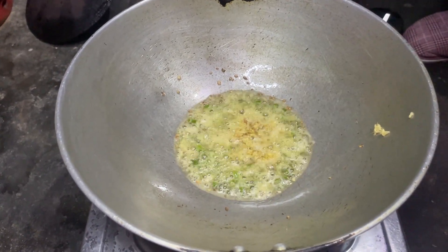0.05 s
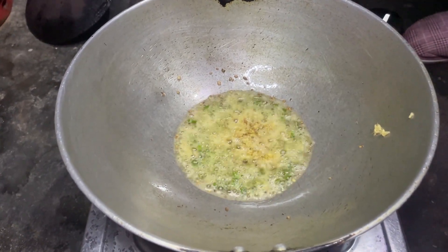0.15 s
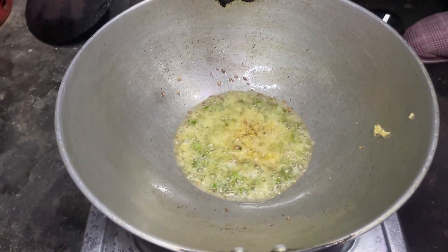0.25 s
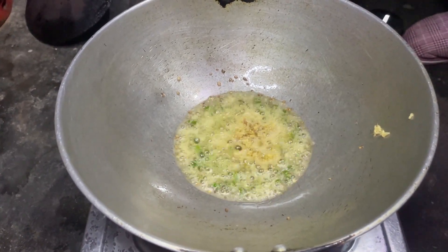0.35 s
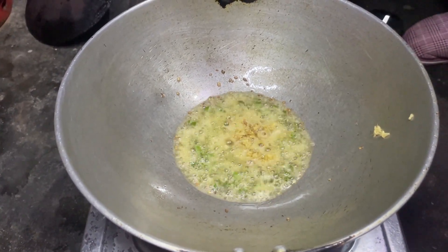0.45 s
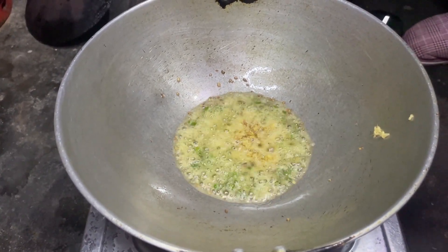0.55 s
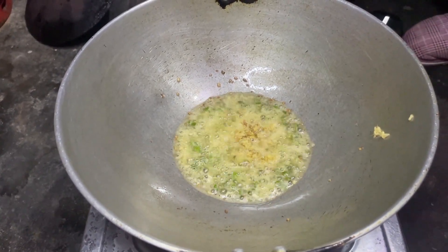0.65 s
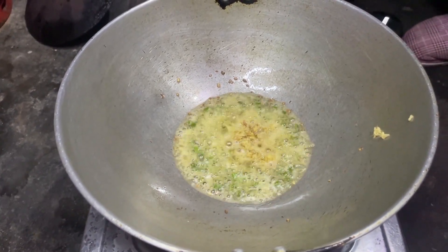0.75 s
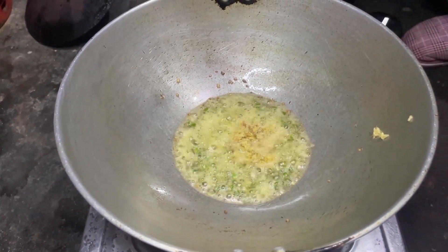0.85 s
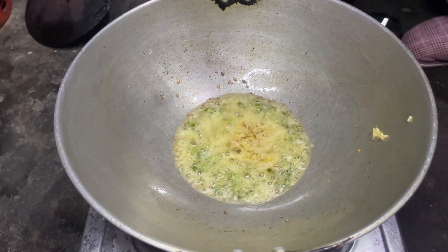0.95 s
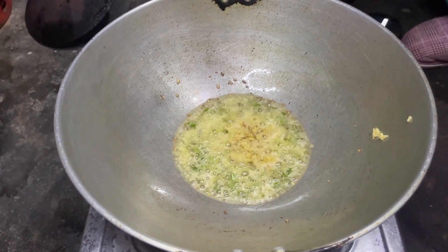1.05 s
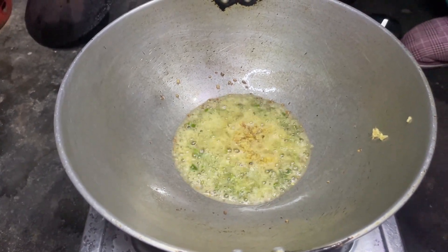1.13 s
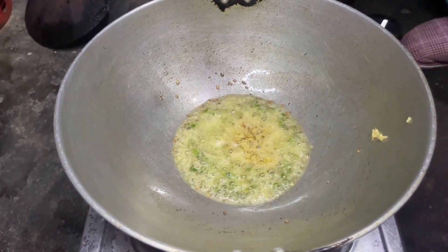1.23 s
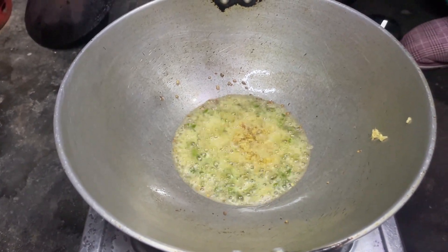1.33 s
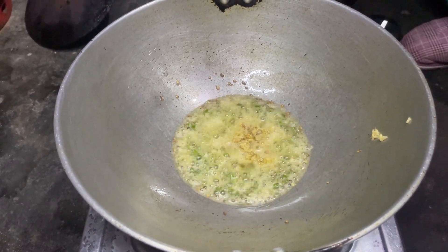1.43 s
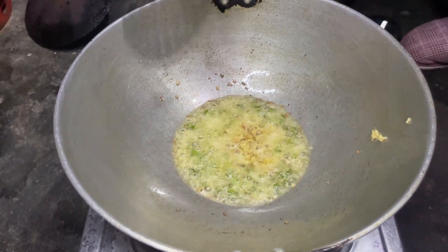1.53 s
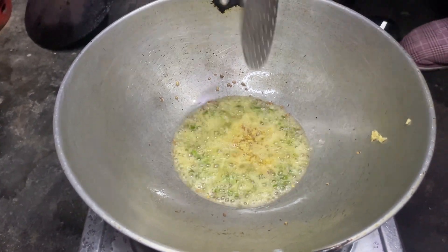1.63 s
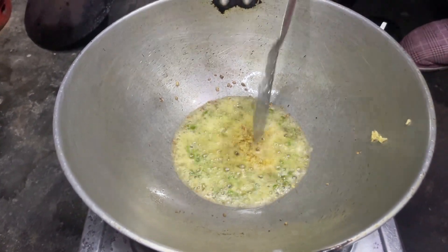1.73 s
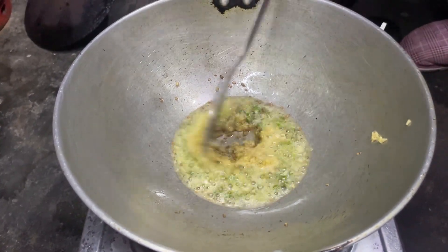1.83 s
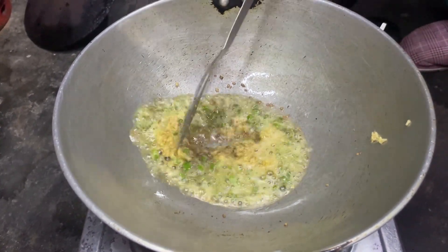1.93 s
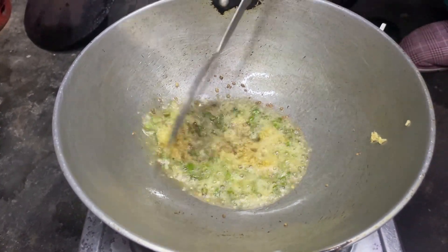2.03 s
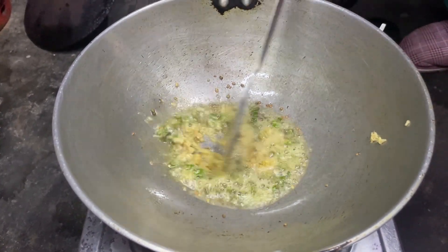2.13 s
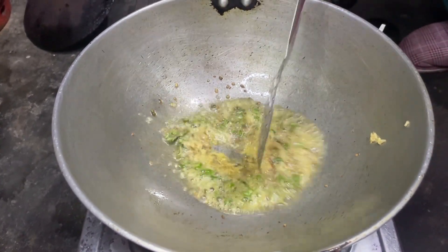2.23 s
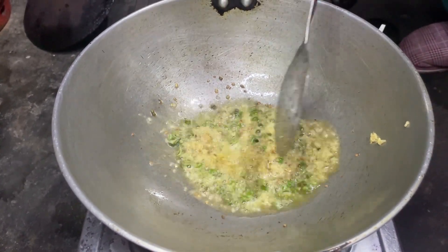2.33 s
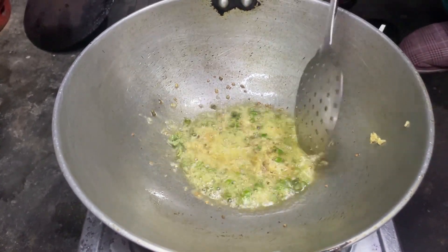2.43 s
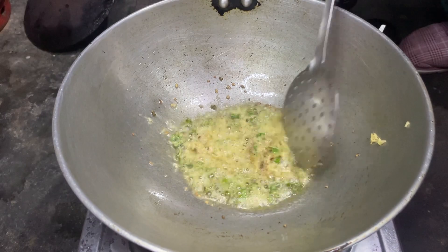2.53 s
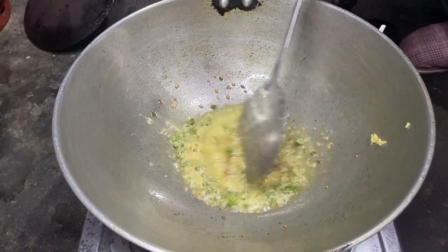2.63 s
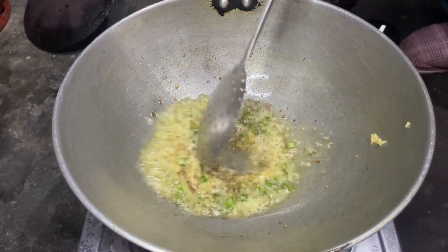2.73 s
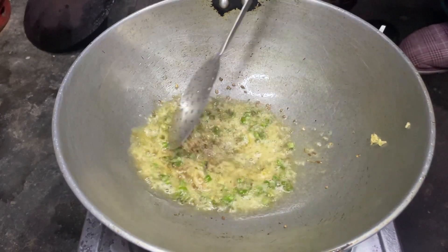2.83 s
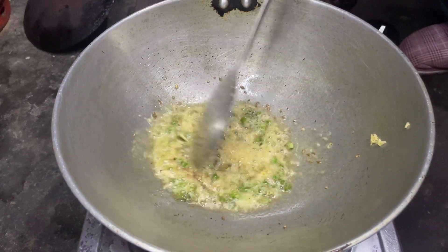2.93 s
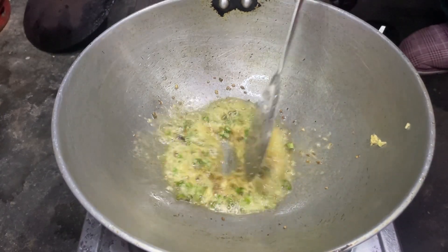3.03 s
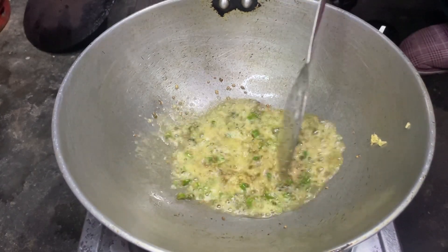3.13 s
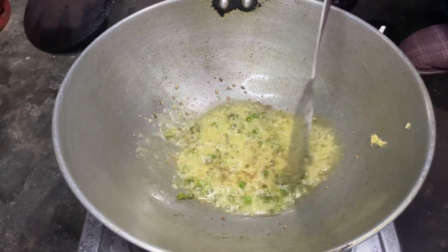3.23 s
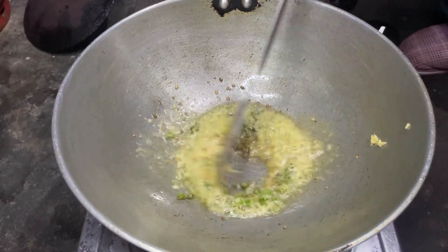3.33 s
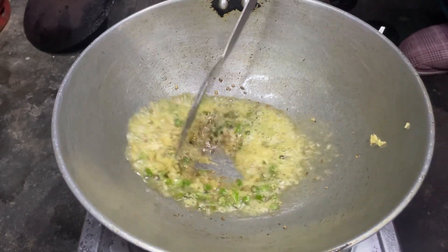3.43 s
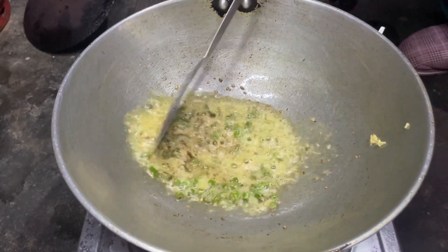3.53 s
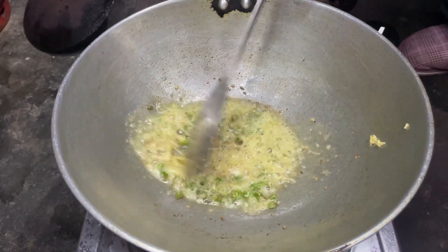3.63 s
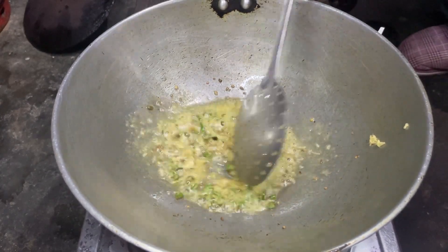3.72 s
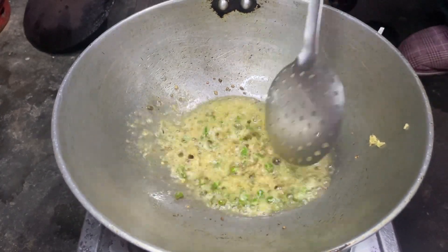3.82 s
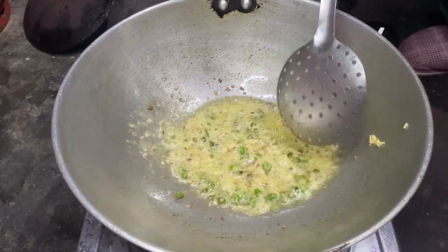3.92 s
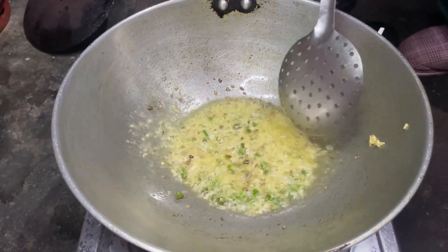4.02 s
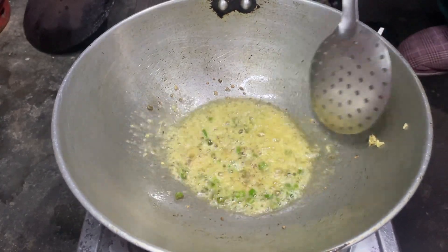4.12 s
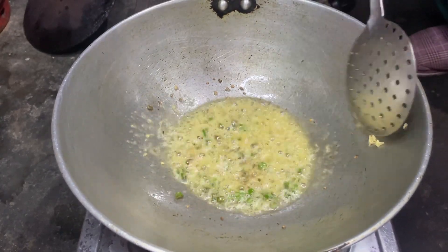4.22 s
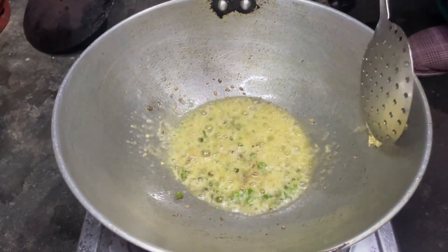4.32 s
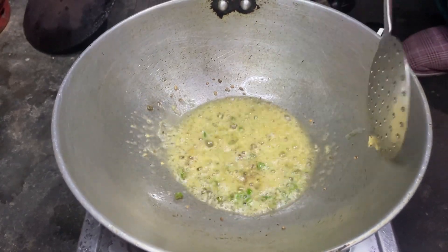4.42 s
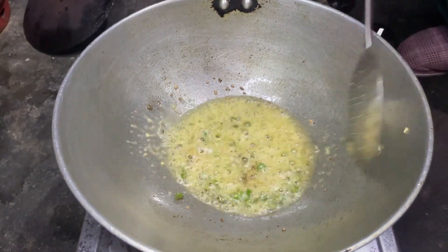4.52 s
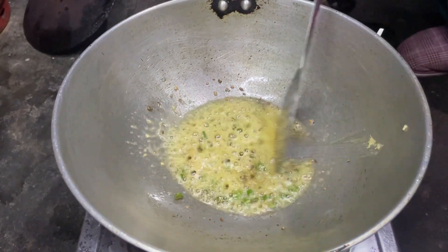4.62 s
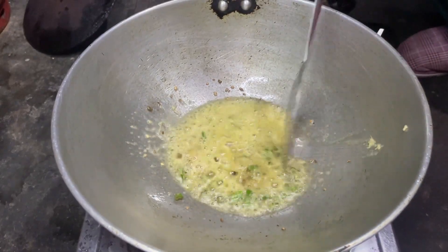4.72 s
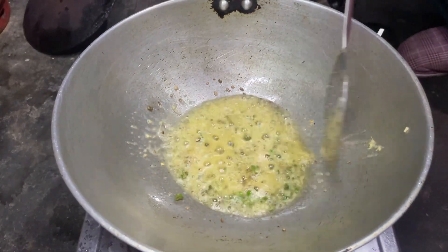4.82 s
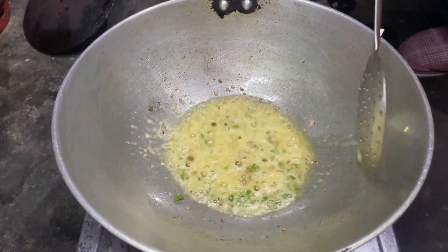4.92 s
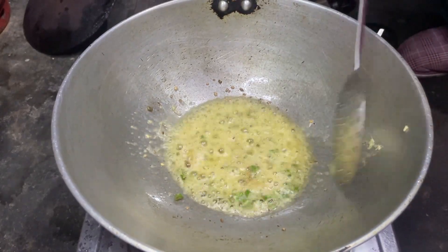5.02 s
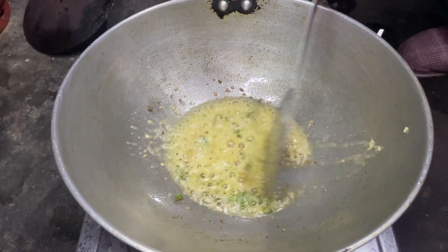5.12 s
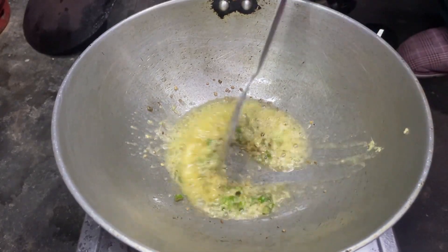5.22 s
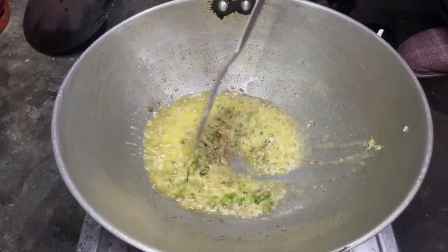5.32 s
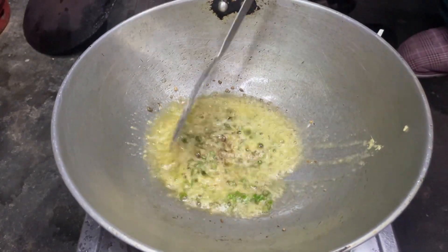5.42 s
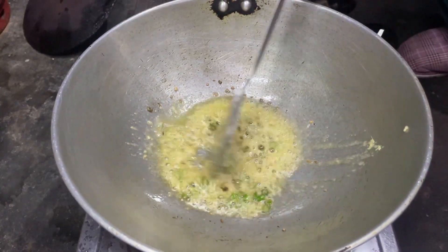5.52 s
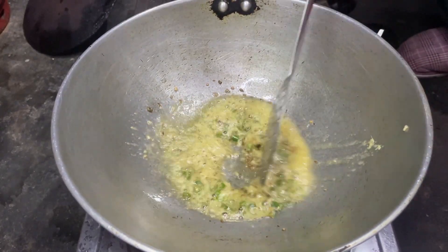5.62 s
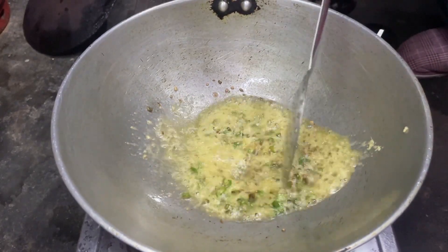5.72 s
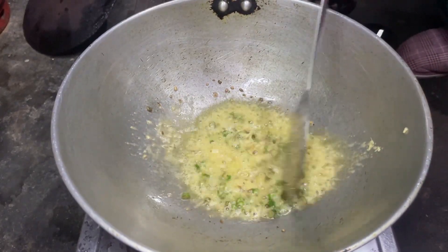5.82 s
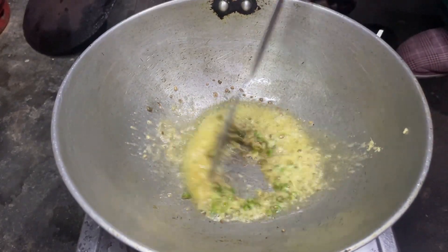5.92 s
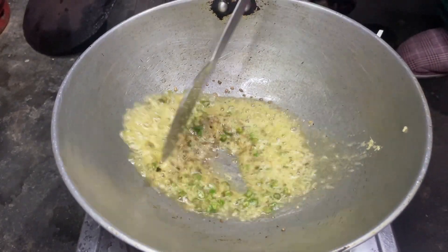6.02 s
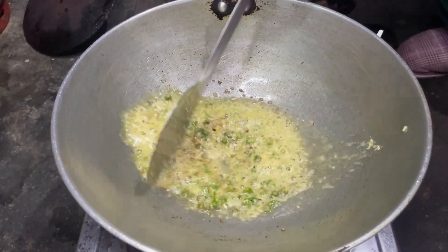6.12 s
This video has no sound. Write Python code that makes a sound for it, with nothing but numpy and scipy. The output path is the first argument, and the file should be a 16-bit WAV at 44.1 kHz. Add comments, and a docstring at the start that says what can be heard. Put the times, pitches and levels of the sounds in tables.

```python
"""A clink of steel dies away over the steady sizzle of garlic, chilli and spices in hot oil in a metal wok.
Oil spits throughout; a slotted metal spoon then stirs, lifting the sizzle, and knocks and scrapes on the wok.
The sizzle is spiky noise plus bursting-bubble grains, the spits are snaps with spray, the clink and
knocks are ringing modes, and the scrapes are jerky noise with a squeal. A gas flame's rumble and a hum
lie under it all; a close pair of microphones hears it in a small kitchen."""
import sys
import numpy as np
from scipy import signal
from scipy.fft import rfft, irfft, next_fast_len
from scipy.io import wavfile
from scipy.ndimage import map_coordinates

SR = 44100
rng = np.random.default_rng(int(sys.argv[2]) if len(sys.argv) > 2 else 0)


def generate_wav(sig):
    """Save sig (samples, or channels by samples) to the path in sys.argv[1] as 16-bit PCM at SR."""
    pcm = np.round(np.clip(np.atleast_2d(sig).T, -1, 1) * 32767).astype(np.int16)
    wavfile.write(sys.argv[1], SR, pcm)


N = 271656
TIME = np.arange(N) / SR
TOP_HZ = 15850  # band limit of the whole mix


def amp(db):
    """Decibels to a linear factor."""
    return 10 ** (np.asarray(db) / 20)


def unit(x):
    """x scaled to an RMS of one."""
    return x / np.sqrt(np.mean(x ** 2) + 1e-20)


def along(points, hz):
    """A curve of (frequency, value) points read on a log frequency axis."""
    f, v = np.transpose(points)
    return np.interp(np.log(hz + 1), np.log(f), v)


def wobble(rate):
    """A smooth random curve with rate knots a second."""
    knots = rng.standard_normal(int(N * rate / SR) + 4)
    return map_coordinates(knots, [TIME * rate])


def filtered(x, response):
    """x times a complex response of frequency."""
    m = next_fast_len(N + SR // 2)
    return irfft(rfft(x, m) * response(np.fft.rfftfreq(m, 1 / SR)), m)[..., :N]


def coloured(x, points, size=4096):
    """x through a causal, minimum-phase filter of unit energy with the given spectrum."""
    cepstrum = irfft(np.log(amp(along(points, np.fft.rfftfreq(size, 1 / SR)))))
    cepstrum[1:size // 2] *= 2
    cepstrum[size // 2 + 1:] = 0
    kernel = irfft(np.exp(rfft(cepstrum)))
    return signal.fftconvolve(x, kernel / np.linalg.norm(kernel))[:len(x)]


def lowpass(x, order, hz):
    """x with the treble above hz rolled off."""
    return signal.lfilter(*signal.butter(order, hz, fs=SR), x)


def resonate(x, peaks):
    """x through a bank of resonances in parallel."""
    return sum(amp(db) * signal.lfilter(*signal.iirpeak(hz, hz / width, fs=SR), x) for hz, width, db in peaks)


def add(track, s, sound):
    """Mix a sound into the track at time s."""
    start = max(round(s * SR), 0)
    track[start:start + len(sound)] += sound[:N - start]


def ring(modes):
    """Decaying modes of struck metal, each starting at a chance point of its swing."""
    t = TIME[:SR // 2]
    out = np.zeros(len(t))
    for hz, db, t60 in modes:
        out += amp(db - 60 * t / t60) * np.sin(2 * np.pi * (hz * t + rng.random()))
    return out


# a steel utensil ringing out: (pitch [Hz], level [dB], t60 [s])
UTENSIL_MODES = [(736, -25.5, 0.2), (1100, -33.5, 0.26), (1850, -35, 0.09), (2050, -23, 0.089),
                 (2457, -25.5, 0.27), (3165, -40, 0.6)]


def utensil():
    """Steel modes already ringing as the sound begins, faded in over 1.9 ms so the opening does not click."""
    out = np.zeros(N)
    add(out, 0, ring(UTENSIL_MODES))
    rise_s = 0.0019
    return out * (1 - np.exp(-TIME / rise_s))


# sweeps of the spoon through the food: (time at the height [s], extra sizzle [dB])
SWEEPS = [(2.23, 0.4), (3.1, 1), (3.52, 2.5), (3.78, 2), (5.92, 1.5)]
SWEEP_RISE_S, SWEEP_FALL_S = 0.14, 0.22


def flare_db():
    """Every sweep swells the sizzle and lets it sink back."""
    total = np.zeros(N)
    for s, db in SWEEPS:
        width = np.where(TIME < s, SWEEP_RISE_S, SWEEP_FALL_S)
        total += db * np.exp(-((TIME - s) / width) ** 2)
    return total


# the undisturbed oil, and what stirring adds by pushing wet pieces onto hot metal
CALM_SIZZLE_DB, CALM_BURBLE_DB = -39, -48
STIR_START_S, STIR_RISE_S, STIR_SIZZLE_DB, STIR_BURBLE_DB = 1.72, 0.37, 4.5, 3


def frying():
    """How far the food is stirred up (0-1), and the sizzle and burble levels [dB] that follow from it."""
    stirred = np.clip((TIME - STIR_START_S) / STIR_RISE_S, 0, 1)
    sizzle_db = CALM_SIZZLE_DB + STIR_SIZZLE_DB * stirred + flare_db()
    return stirred, sizzle_db, CALM_BURBLE_DB + STIR_BURBLE_DB * stirred


def bubbles(rate, pitch_hz, spread, cycles, size_db, size=64):
    """Bursting bubbles, each a damped cosine of a few cycles; rate is per second, for every sample."""
    count = 60000  # candidates, thinned out to the wanted rate
    when, chance = rng.random(count), rng.random(count)
    detune, bulk = rng.standard_normal(count), rng.exponential(size=count)
    start = (when * N).astype(int)
    keep = chance < rate[start] * N / SR / count
    hz = np.minimum(pitch_hz * np.exp(spread * detune[keep]), SR / 3)
    turns = hz[:, None] * TIME[:size]
    loudness = amp(size_db * np.minimum(bulk[keep], 4))[:, None]
    grains = loudness * np.exp(-turns / cycles) * np.cos(2 * np.pi * turns)
    places = start[keep, None] + np.arange(size)
    return np.bincount(places.ravel(), grains.ravel(), N + size)[:N]


# colour of the bursting steam bubbles: (frequency [Hz], relative level [dB])
STEAM_COLOUR = [(200, -21.5), (600, -14), (1100, -1.5), (1450, -4.5), (1900, -1.5), (3300, -3.5),
                (5400, -2.5), (7500, 0.5), (9000, -1), (13000, -3.5), (15500, -2)]


def fizz(stirred):
    """The finest bubbles blur into spiky noise, brighter when stirred and never quite steady."""
    spikes = rng.standard_normal(N) * amp(7.6 * rng.standard_normal(N))
    bright = unit(coloured(spikes, STEAM_COLOUR))
    dull = filtered(bright, lambda hz: 1 / np.sqrt(1 + (hz / 6500) ** 2))
    return (stirred * bright + (1 - stirred) * dull) * amp(1.58 + 1.5 * wobble(25.08))


def crackle(stirred):
    """Separate steam bubbles burst at an uneven rate, more densely once stirred."""
    rate = (800 + 1700 * stirred) * amp(2.3 * wobble(30))
    bursts = bubbles(rate, pitch_hz=6760, spread=0.48, cycles=0.42, size_db=4.0)
    evened = bursts / np.sqrt(1 + 1.24 * stirred)  # offsets the loudness of the denser bursts
    return unit(coloured(evened, STEAM_COLOUR)) * amp(0.5)


# the foam wells up or sloshes round the spoon: (time at the height [s], half length [s], level [dB])
SURGES = [(1.25, 0.46, -51), (2.646, 0.06, -45.5), (5.122, 0.046, -46)]
# the hollow note of the bowl in a surge: (pitch [Hz], width [Hz], relative level [dB])
HOLLOW = [(403, 128, 2)]


def surges(foam):
    """The foam swells through the bowl's hollow resonance, applied twice for a sharper note."""
    hollow = unit(resonate(resonate(foam, HOLLOW), HOLLOW))
    swell = sum(amp(db) * np.exp(-((TIME - s) / half) ** 2) for s, half, db in SURGES)
    return swell * hollow


# colour of the foaming oil: (frequency [Hz], relative level [dB])
FOAM_COLOUR = [(80, -17.5), (170, -12), (225, 4), (270, -13), (330, 2), (410, -3), (600, 1), (1100, 0.5),
               (2500, -11.5), (6000, -71)]


def sizzle():
    """Water leaves the food as steam: a fine fizz, separate crackles and the burble of the foam."""
    stirred, sizzle_db, burble_db = frying()
    steam = amp(sizzle_db) * (fizz(stirred) + crackle(stirred))
    foam = bubbles(np.full(N, 1200), pitch_hz=630, spread=0.55, cycles=1.0, size_db=1.5, size=600)
    burble = amp(burble_db) * unit(coloured(foam, FOAM_COLOUR))
    return steam + burble + surges(foam)


# burner rumble: (frequency [Hz], relative level [dB])
RUMBLE_COLOUR = [(15, -7), (36, -6), (48, 9), (75, -1.5), (120, -5), (150, -2.5), (200, -4.5), (400, -16.5),
                 (1500, -32)]
# kitchen hum: (pitch [Hz], relative level [dB], unsteadiness [share])
HUM = [(58.9, -47.5, 0.54), (101.5, -53.5, 0.79)]


def stove():
    """The flame rumbles, partly alike on both sides, under a hum wavering in level and phase."""
    shared, left, right = [unit(coloured(rng.standard_normal(N), RUMBLE_COLOUR)) for _ in range(3)]
    rumble = amp(-49) * (shared + 0.71 * np.array([left, right]))
    hum = np.zeros(N)
    for hz, db, unsteady in HUM:
        waver = 1 + unsteady * (wobble(13) + 1j * wobble(24))
        hum += amp(db - 1.0) * np.real(waver * np.exp(2j * np.pi * hz * TIME))
    return (rumble + hum) * amp([[.7], [-.7]])  # a little louder on the left


def snap(hz):
    """A pressure flick that swells and dies within a cycle or two."""
    cycles = hz * TIME[:300]
    age = cycles / 0.35  # the envelope peaks after 0.35 cycles
    return np.sin(2 * np.pi * cycles) * age * np.exp(1 - age)


# the loudest spits of oil: (time [s], level of the snap's envelope peak [dB], pitch [Hz])
SPITS = [(0.181, -16, 5430), (0.29, -19, 3400), (0.3999, -11, 4600), (0.4196, -15, 4300),
         (0.4686, -13.5, 5700), (0.533, -20, 2180), (0.6219, -16, 7500), (0.7305, -14.5, 6500),
         (0.7932, -18, 5940), (0.8501, -16, 4830), (0.9583, -18.5, 2970), (0.9944, -25, 5800),
         (1.0473, -10, 5540), (1.056, -15, 4030), (1.0968, -17, 4400), (1.179, -14, 5800),
         (1.2028, -10, 9900), (1.2959, -16, 5000), (1.462, -17, 3200), (1.501, -17, 2430),
         (1.5605, -14, 3940), (1.6382, -14, 10000), (1.7294, -25, 4340), (1.8054, -9, 9000),
         (1.9217, -13, 5600), (1.94, -14, 4300), (2.0702, -17, 11000), (2.205, -8, 10500),
         (2.715, -9.5, 4500), (2.825, -16.5, 4900), (3.1017, -17, 4100), (3.26, -7, 6300),
         (3.39, -17, 5950), (3.8764, -9, 6500), (3.9006, -4, 4540), (4.292, -5, 11500), (4.3294, -10, 6600),
         (4.478, -8.5, 6600), (4.5065, -13, 4220), (4.8103, -10.5, 3400), (4.9877, -7, 5900),
         (4.9887, -16.5, 3950), (5.1657, -20, 3800), (5.3948, -20, 2370), (5.784, -13.5, 3020),
         (5.8773, -16, 5500), (5.9118, -14.5, 2540), (6.0667, -11.5, 6350)]
SPRAY_DB, SPRAY_S = -9.5, 0.00055  # against the snap; decay time
POP_HZ, POP_DB = 1300, -17.5  # soft pop of the collapsing bubble, against the snap


def spits():
    """Big bubbles snap, pop and throw a fine spray, all within a few milliseconds."""
    out, t = np.zeros(N), TIME[:300]
    for s, db, hz in SPITS:
        spray = amp(SPRAY_DB) * rng.standard_normal(len(t)) * np.exp(-t / SPRAY_S)
        pop = amp(POP_DB) * snap(POP_HZ)
        add(out, s, amp(db) * (snap(hz) + pop + spray))
    return out


# the dense, quickly damped rattle of spoon on wok: (frequency [Hz], relative level [dB])
CLANK_COLOUR = [(90, -40), (180, 0), (500, 1), (800, 2.5), (1200, 0), (1800, 9.5), (2700, -4), (3500, 3),
                (5700, 9.5), (7000, 1), (8000, 5), (15000, -2.5)]


def clatter(t60):
    """Clank-coloured noise dying away, for modes too dense to hear singly."""
    t = TIME[:SR // 2]
    return coloured(rng.standard_normal(len(t)) * amp(-60 * t / t60), CLANK_COLOUR)


# spoon blows, thin high on the wall, dull where food cushions them:
# (time [s], strength [dB], freedom to ring [0-1], lowest frequency [Hz], highest frequency [Hz])
KNOCKS = [(1.7736, 1.5, 0.34, 110, 420), (1.789, -2, 0.3, 120, 280), (2.215, 6.5, 0.22, 2200, 2750),
          (2.5205, 7.5, 0.45, 230, 14000), (2.5305, -3, 0.5, 700, 6000), (2.611, -9.5, 0.5, 500, 7000),
          (3.9, 0.5, 0.3, 453, 2280), (4.4, -8, 0, 1000, 15000), (4.52, 0, 0.66, 150, 300),
          (5.4685, 8.5, 0.54, 170, 724)]
# the flexing bowl's thump: (frequency [Hz], relative level [dB])
THUMP_COLOUR = [(80, -17), (180, -0.5), (500, 2.5), (900, -1), (1400, -8), (3000, -8), (9000, -46)]
# the wok with the spoon on it: (pitch [Hz], relative level [dB], t60 [s])
WOK_MODES = [(236, 1, 0.31), (321.5, 0.5, 0.44), (402, -3, 0.45), (500, 1.5, 0.41), (696, 2, 0.32),
             (760, 2.5, 0.29), (1107, -3, 0.22), (1830, 10.5, 0.12), (1980, 7, 0.16), (2222, 9.5, 0.31),
             (3260, 10, 0.1), (3430, 10, 0.15), (4750, 7.5, 0.2), (4960, 8, 0.12), (5290, 1, 0.2),
             (5900, 14, 0.13), (6270, 6, 0.1), (6870, 19, 0.086), (7100, 10, 0.11)]
# levels against the blow's strength, and decays when wholly free to ring
THUMP_DB, RATTLE_DB, SHIMMER_DB, RING_DB = -3, -18.5, -26.5, -39
RATTLE_T60_S, SHIMMER_T60_S, SHIMMER_HZ = 0.093, 0.22, 5500


def knocks():
    """Spoon hits wok: a thump, a rattle, a duller, longer shimmer and modes, damped by a pressed spoon."""
    out = np.zeros(N)
    count = SR // 2
    hz = np.fft.rfftfreq(count, 1 / SR)
    flex = irfft(np.exp(-2j * np.pi * 0.1435 * np.sqrt(hz)), count)  # bending waves: treble arrives first
    thump = coloured(flex, THUMP_COLOUR)
    for s, db, free, low_hz, high_hz in KNOCKS:
        free = np.clip(free, .05, 1)
        blow = amp(THUMP_DB) * thump
        blow += amp(RATTLE_DB) * clatter(free * RATTLE_T60_S)
        blow += amp(SHIMMER_DB) * lowpass(clatter(free * SHIMMER_T60_S), 1, SHIMMER_HZ)
        blow += free * amp(RING_DB) * ring(WOK_MODES)
        blow = signal.lfilter(*signal.butter(2, low_hz, "high", fs=SR), amp(db) * blow)
        add(out, s, lowpass(blow, 3, min(high_hz, TOP_HZ)))  # a soft contact dulls the blow
    return out


# the spoon's edge dragging on the wok: (time [s], length [s], share of it spent rising [0-1], level [dB],
# ringing against the rasp [dB], squeal pitch [Hz], squeal level [dB], highest rasp and ringing [Hz])
SCRAPES = [(2.532, 0.13, 0.26, -36.5, -9, 2220, -36.5, 6000),
           (4.398, 0.043, 0.09, -24.5, -5, 6440, -30, 15000), (5.022, 0.069, 0.52, -31, 2, 5410, -31, 9000)]
# the dry rasp of its edge: (frequency [Hz], relative level [dB])
RASP_COLOUR = [(100, -18), (250, 0), (600, -8), (1080, 4), (1500, -11), (2200, -6), (3000, -4),
               (4500, -2.5), (6500, 1), (8000, 7), (15000, -6.5)]
# the spoon's resonances when it is rubbed: (pitch [Hz], width [Hz], relative level [dB])
SPOON_MODES = [(1110, 110, -5), (2160, 60, -6.5), (4120, 30, -10), (4746, 42, 0.5), (5850, 40, -3),
               (6200, 35, -2), (6370, 35, 7), (7320, 30, 4), (7350, 60, 0)]
SQUEAL_WANDER = 0.0015  # share of its pitch


def scrapes():
    """The edge slips in tiny jerks that rasp and drive its resonances; a squeal follows the pressure."""
    out, t = np.zeros(N), TIME[:SR // 2]
    for s, length, rising, db, ring_db, squeal_hz, squeal_db, high_hz in SCRAPES:
        pressure = np.interp(t, [0, length * np.clip(rising, .02, .9), length], [0, 1, 0])
        jerks = rng.standard_normal(len(t)) * amp(2.0 * rng.standard_normal(len(t)))
        slips = jerks * pressure ** 0.98
        ringing = amp(ring_db) * unit(resonate(slips, SPOON_MODES))
        rub = lowpass(unit(coloured(slips, RASP_COLOUR)) + ringing, 2, min(high_hz, TOP_HZ))
        rub = rub / np.std(rub[:int(length * SR)])
        turns = np.cumsum(squeal_hz * (1 + SQUEAL_WANDER * wobble(60)[:len(t)])) / SR
        squeal = amp(squeal_db) * np.sqrt(pressure) * np.sin(2 * np.pi * turns)
        add(out, s, amp(db) * rub + squeal)
    return out


# colour of the diffuse echo, much weaker above 7 kHz: (frequency [Hz], level [dB])
ECHO_COLOUR = [(100, -13.5), (500, -3.5), (1500, -2), (3000, -1.5), (6500, -5), (8000, -19), (15000, -17.5)]


def diffuse_echo(x, bowl_t60, room_t60, room_db, size=2048, count=12288):
    """Quick reflections in the bowl, then the walls: noise tails redrawn per side every 2048 samples."""
    t = TIME[:count]
    envelope = amp(-60 * t / bowl_t60) + amp(room_db - 60 * t / room_t60)
    envelope = envelope * (t > .0006)  # the first echo comes after 0.6 ms
    pieces = np.pad(x, (0, -N % size)).reshape(-1, size)
    wet = np.zeros((2, N))
    for side in wet:
        tails = rng.standard_normal((len(pieces), count)) * envelope / np.linalg.norm(envelope)
        for k, echo in enumerate(signal.fftconvolve(pieces, tails, axes=1)):
            add(side, k * size / SR, echo)
    return filtered(wet, lambda hz: amp(along(ECHO_COLOUR, hz)))


# phase between the microphones: (frequency [Hz], lead of the right [rad])
RIGHT_LEAD = [(100, 0.08), (800, -0.51), (1700, 0.09), (2800, -1.91), (3600, -0.17), (4200, -0.07),
              (5000, -1.14), (5800, 0.37), (6800, 1.31), (7800, 3.09), (8800, 3.26), (10500, 5.77),
              (12200, 6.35), (14500, 9.36)]
# level between the microphones: (frequency [Hz], left over right [dB])
LEFT_TILT = [(100, -3), (350, 0.5), (550, 2), (1100, 4.5), (1800, 1), (2600, 5.5), (3300, 6.5), (4500, 4),
             (6500, 2), (8000, 0)]


def scene():
    """Phase and level differences place the wok between the microphones; echoes and stove join in."""
    wok = sizzle() + spits() + knocks() + scrapes()
    sides = np.array([[.5], [-.5]])  # each side takes half of the difference
    direct = filtered(wok + utensil(), lambda hz: np.exp(-1j * sides * np.interp(hz, *np.transpose(RIGHT_LEAD))))
    both = direct + diffuse_echo(wok, bowl_t60=0.014, room_t60=0.21, room_db=6.5)
    return filtered(both, lambda hz: amp(sides * along(LEFT_TILT, hz))) + stove()


def record(dry):
    """Nothing is kept above the band limit."""
    return filtered(dry, lambda hz: hz < TOP_HZ)


dry = scene()
out = record(dry)
generate_wav(out)
```